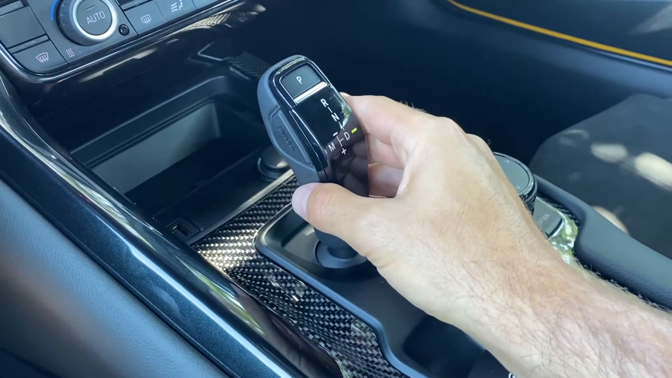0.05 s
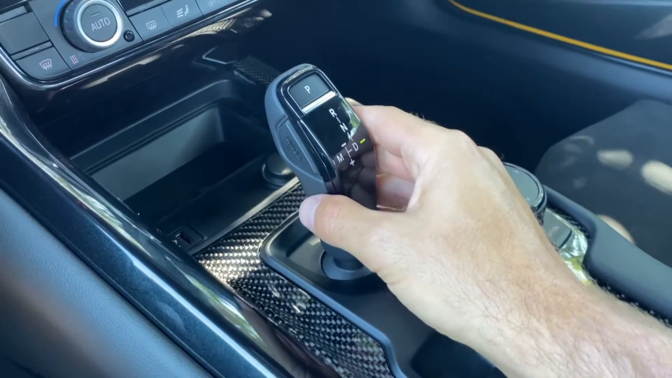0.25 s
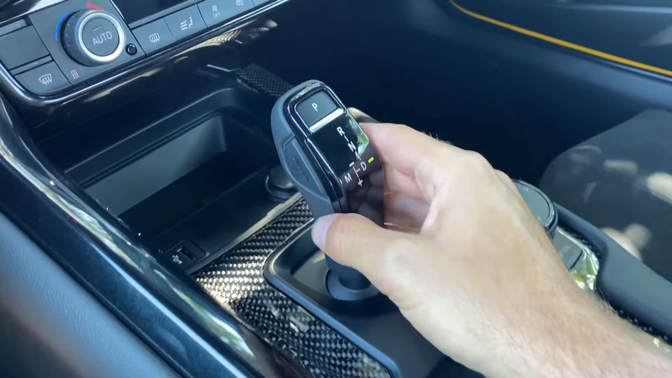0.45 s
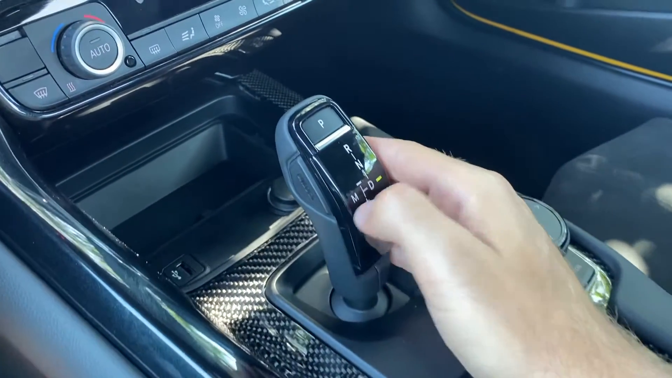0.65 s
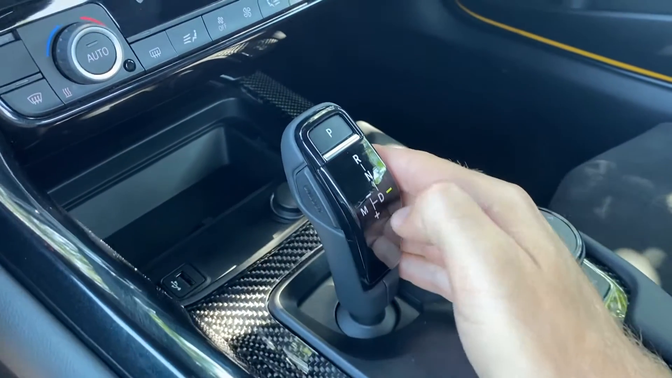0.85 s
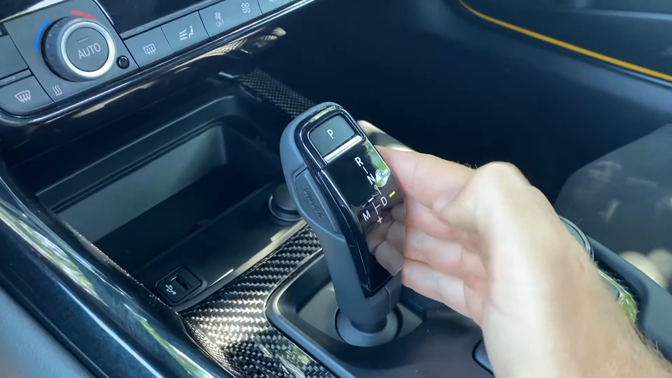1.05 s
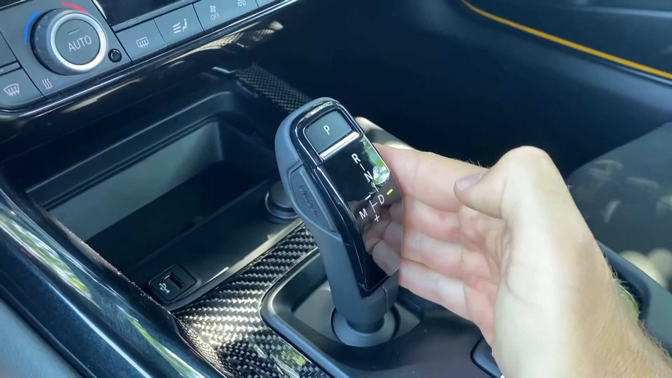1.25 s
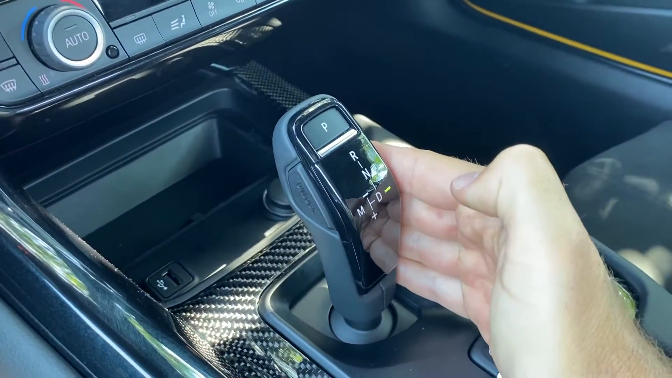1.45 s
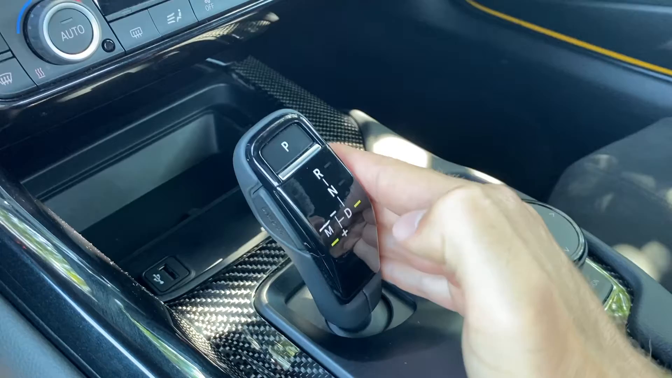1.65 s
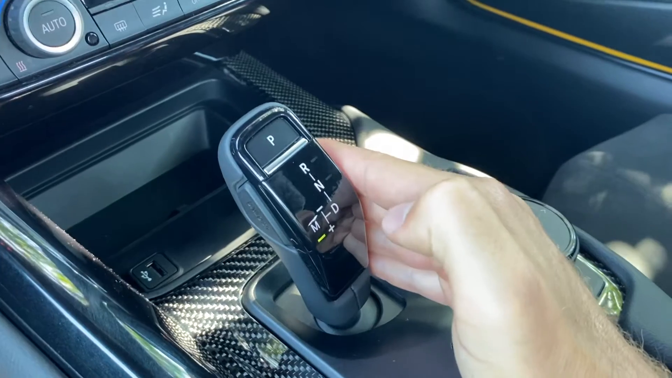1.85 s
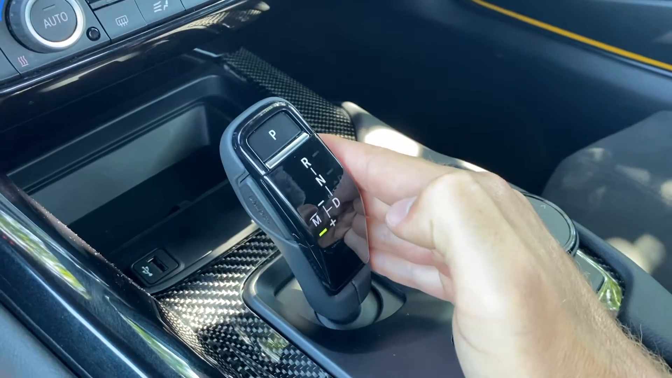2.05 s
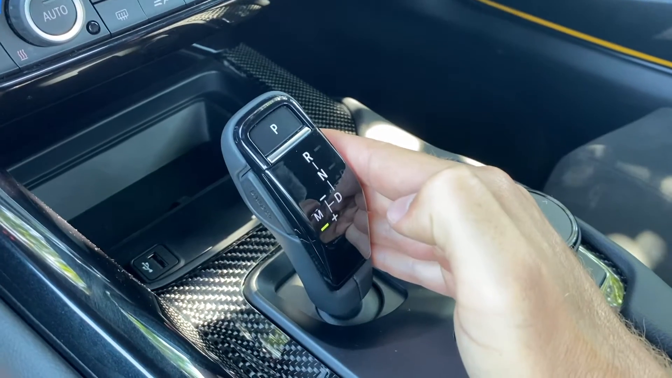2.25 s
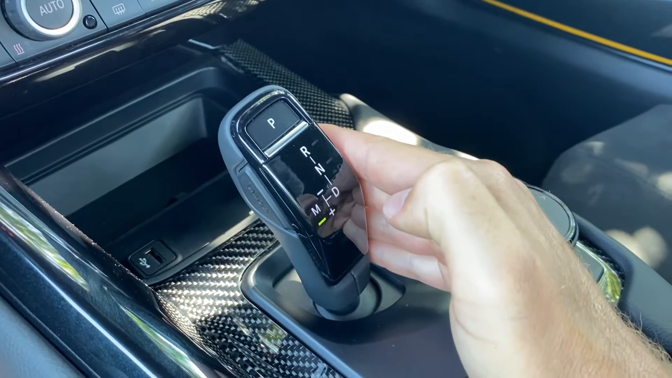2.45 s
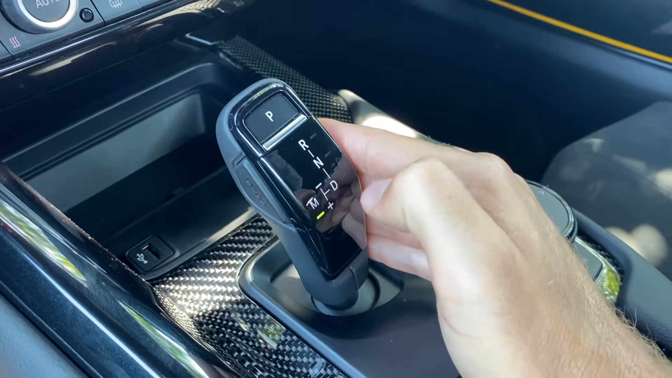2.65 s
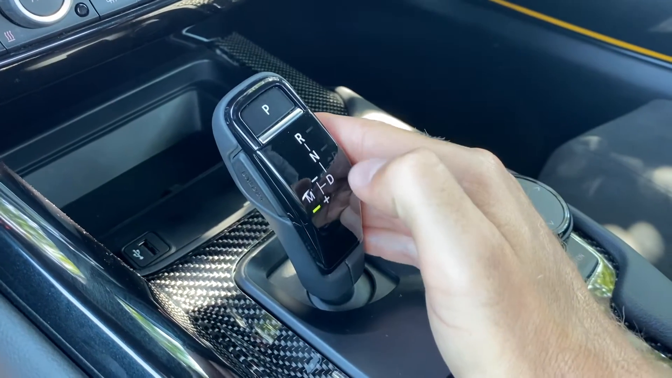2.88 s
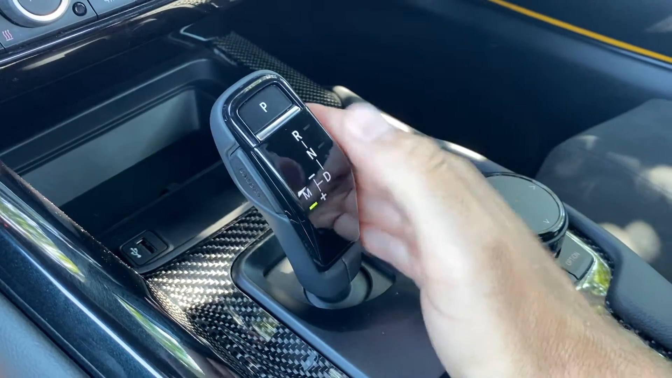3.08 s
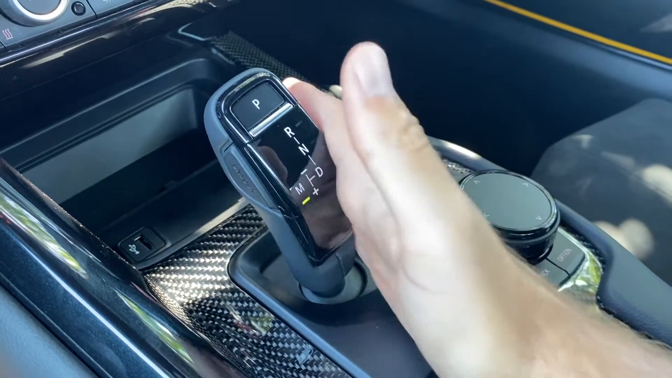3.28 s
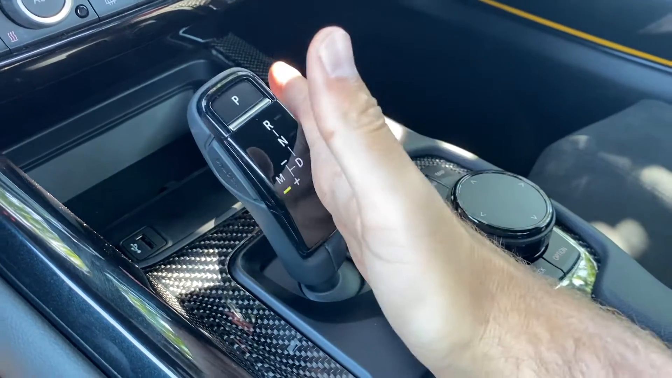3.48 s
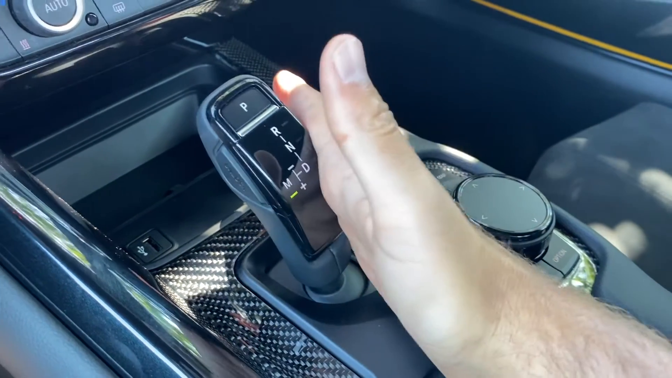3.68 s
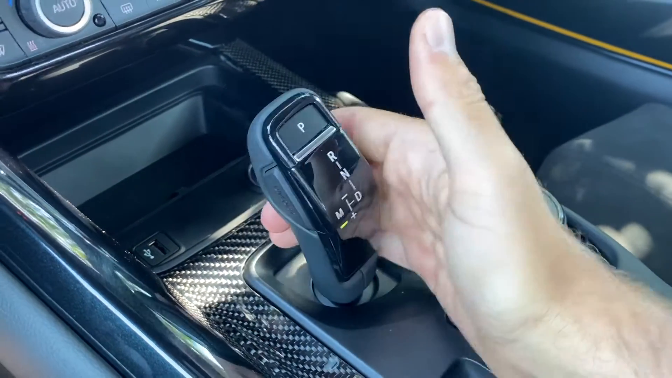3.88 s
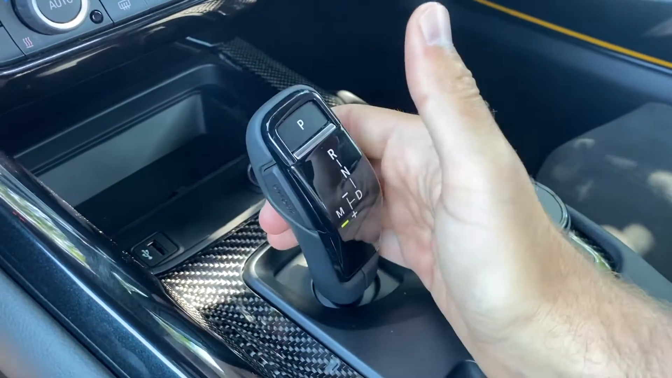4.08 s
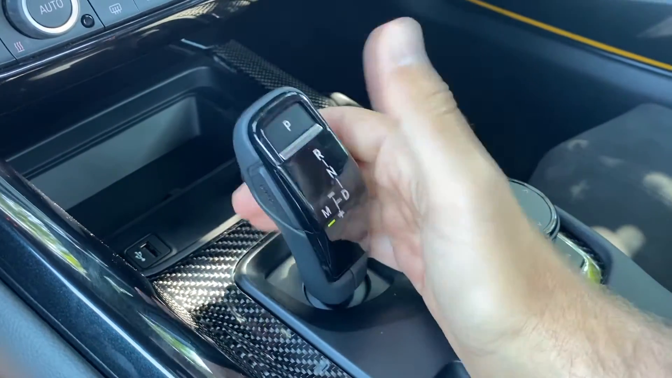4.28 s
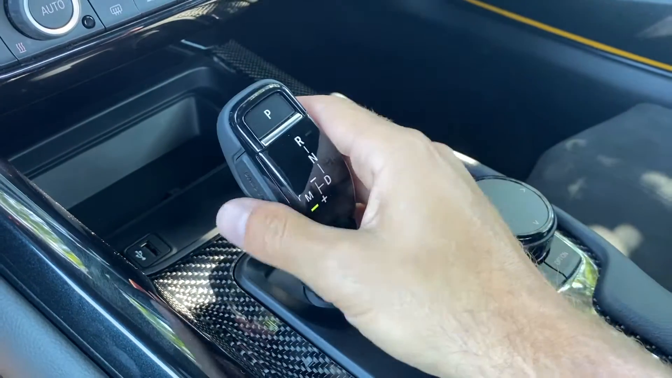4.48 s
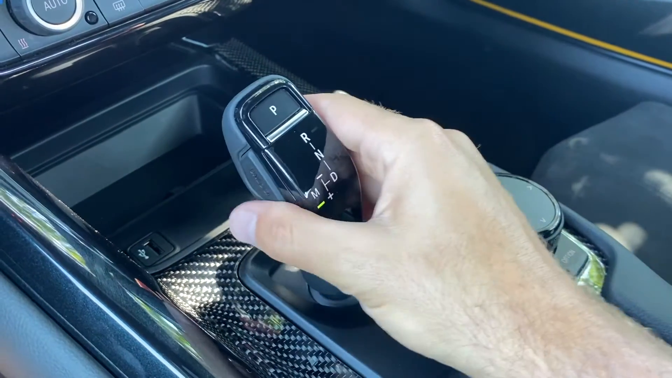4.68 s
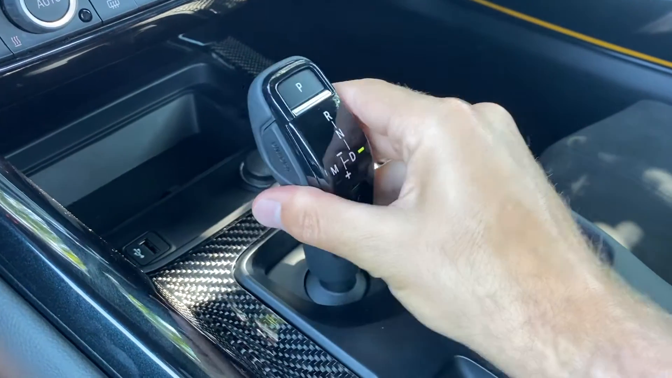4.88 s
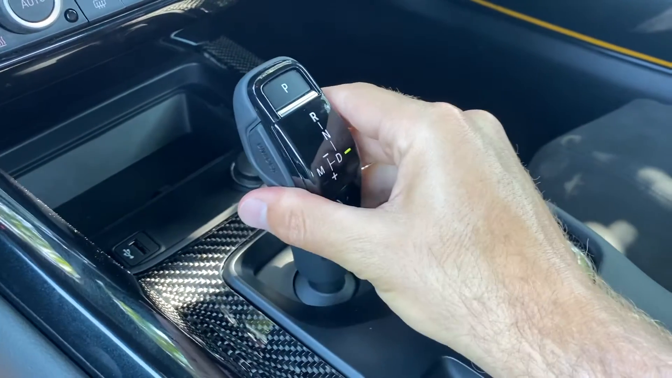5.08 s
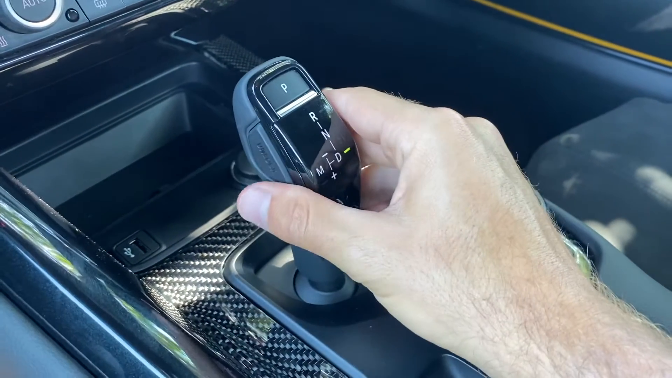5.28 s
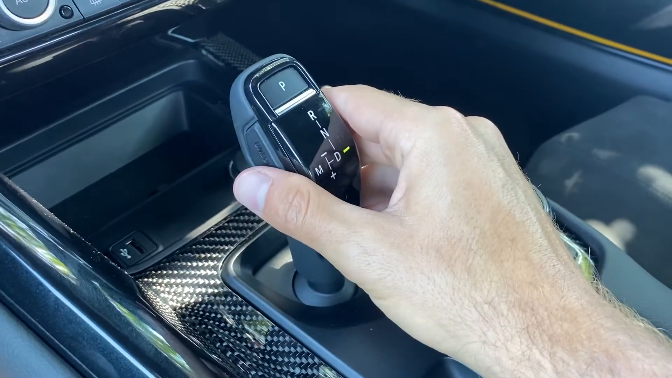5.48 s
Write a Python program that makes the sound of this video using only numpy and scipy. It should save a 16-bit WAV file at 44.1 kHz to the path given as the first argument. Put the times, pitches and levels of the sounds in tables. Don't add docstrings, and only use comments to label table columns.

```python
import sys
import numpy as np
from scipy import signal
from scipy.fft import rfft, irfft
from scipy.io import wavfile
from scipy.ndimage import uniform_filter1d

SR = 44100
rng = np.random.default_rng(int(sys.argv[2]) if len(sys.argv) > 2 else 0)


def magnitude_from_level(level_db):
    exponent = np.asarray(level_db, float) / 20
    return 10 ** exponent


def dump_mix(stems):
    frames = np.atleast_2d(stems).T
    limited = np.clip(frames, -1, 1)
    pcm = np.round(limited * 32767).astype(np.int16)
    wavfile.write(sys.argv[1], SR, pcm)


N = 243873

# start in seconds, clack level in dB,
# thud in dB relative to the clack, crack in dB relative to the clack.
CONTACTS = [(1.59, -59, 6, 3), (1.602, -48, -3, -4), (1.614, -40, -12, 3), (1.6188, -17, 0, -4),
            (1.624, -25, 1.5, -1), (1.64, -33.5, -14, -14), (3.065, -49.5, -5, -14.5), (3.356, -52, 8, -8),
            (3.36, -28.5, -1, -3), (3.373, -42, 6, 0), (3.8075, -46.5, 2, 3), (3.813, -40, 7.5, 1),
            (3.847, -23.5, 1, 0), (3.852, -28.5, -4, 0), (3.858, -34.5, 8.5, -21), (4.342, -44, 1, -3),
            (4.349, -34.5, 6, -2), (4.36, -35, 0, -7), (4.385, -51, 14, -10), (4.802, -41.5, -7, -5.5),
            (4.81, -44, 8, -3), (4.818, -37.5, 7.5, -1), (4.822, -17, -8, -5), (4.828, -47, 18, 5),
            (4.839, -56.5, 29, 8), (4.908, -56, 6, -8)]
POSITION_FROM_S = [0, 3, 3.6, 3.84, 4.1, 4.6]
# frequency in Hz, level in dB per Hz.
LEVER_MODES = [
    [(80, -4.5), (150, -20), (240, -1), (497, -8), (576, -1.5), (644, -10), (746, -1.5), (1200, -21)],
    [(130, -10), (238, -1), (377, -4), (467, -8), (812, -11), (890, -4), (1090, -17.5)],
    [(130, 0), (280, 2), (573, -13), (668, -3.5), (837, 1), (1150, -16)],
    [(100, -8), (123, -23), (178, -7), (573, -4), (641, -20), (751, -5.5), (891, -9.5), (1080, -12.5)],
    [(120, -9), (189, -4), (345, 0.5), (440, -12), (644, -13), (796, -2.5), (973, -15), (1070, -21.5)],
    [(80, -9), (157, -10), (253, -0.5), (390, -6), (529, -4), (746, -4.5), (853, -14), (965, -7)],
]
# frequency in Hz, level in dB per Hz.
MODES_BELOW = [(55, -38)]
MODES_ABOVE = [(1300, -24), (1500, -23), (1950, -47), (3300, -120)]
# frequency in Hz, time to fall 60 dB in seconds.
RING_T60 = [(80, 0.11), (250, 0.135), (700, 0.085), (1500, 0.035)]
# frequency in Hz, level in dB per Hz.
CRACK_COLOURS = [
    [(710, -21), (1200, 2.5), (1320, -5.5), (2480, -8.5), (4770, -22.5), (7980, -24.5), (15500, -37)],
    [(710, -19), (1200, -3), (1570, 3), (1860, -11), (2330, 0.5), (3010, -9.5), (10200, -31), (15500, -33)],
    [(710, -29), (1200, -3), (1880, -5), (2210, 3), (2540, -7), (9270, -24), (15500, -38)],
    [(710, -30), (1200, 0), (2010, -3.5), (2950, -2.5), (3810, -16), (5980, -14.5), (15500, -27)],
    [(710, -21), (1200, -1.5), (2800, -3.5), (3250, -9.5), (7020, -27), (7900, -21), (15500, -39)],
    [(710, -40), (1200, -7), (1490, -1), (3250, -13), (4880, -21), (8700, -23), (15500, -45)],
]
# start in seconds, pitch in Hz, level in dB,
# time to fall 60 dB in seconds.
AFTER_RINGS = [
    (1.628, 106, -53, 0.22),
    (3.066, 990, -53.5, 0.032),
    (4.365, 303, -49.5, 0.28),
    (4.38, 785, -55, .08),
    (4.825, 260, -26.5, 0.073),
    (4.831, 110, -47, .2),
    (4.911, 553, -47.5, 0.048),
]
THUD_TOP_HZ = 600
CRACK_FROM_HZ = 1300
HARD_CONTACT_S, HARD_CRACK_DB, DRAG_S_PER_DB = .0029, -25, .00008

# start in seconds, peak in dB, pitch in Hz,
# bright snap in dB relative to the peak.
TICKS = [(.514, -60, 2620, -8), (2.917, -67, 2400, -22), (2.967, -71, 11000, 0), (2.986, -72, 10000, -2),
         (3.057, -57, 2500, -8), (3.0562, -62, 7200, -18), (3.0615, -63, 12500, -6),
         (3.0655, -45.5, 2750, -12), (3.066, -54, 5500, -8), (3.0717, -51.5, 8450, -9),
         (3.074, -50, 4040, -8), (3.282, -61, 3200, -12), (3.3155, -47, 2240, -13), (3.3735, -58, 5000, -4),
         (3.377, -42.5, 1700, -5), (3.708, -71, 2600, -8), (3.752, -70, 7000, -4), (3.907, -64, 3200, -12),
         (3.918, -64, 2800, -12), (4.227, -68, 5000, -6), (4.257, -62, 3000, 6), (4.257, -63, 13400, -1),
         (4.342, -49.5, 5300, -6), (4.706, -64, 3200, -12), (4.737, -60, 3500, -3), (4.855, -62, 5500, -12),
         (4.966, -60, 2470, -6), (4.973, -63.5, 2950, -8), (5.207, -57, 2700, -3)]
TICK_T60_S = .0078
# start in seconds, swell in seconds, hold in seconds,
# rub level in dB, bright part in dB relative to the rub.
RUBS = [(.38, .116, .002, -86, -5), (2.94, .022, .024, -93, 7), (3.0, .05, .002, -93, 4),
        (3.075, .03, .07, -84, -14), (3.22, .074, .06, -74.5, -5), (3.35, .02, .025, -72, -.8),
        (3.73, .024, .004, -90, -4), (3.76, .04, .002, -76, -10), (3.89, .018, .15, -91, -12),
        (4.255, .003, .002, -82, 4), (4.29, .05, .002, -86, -8), (4.68, .03, .09, -86, -8)]
RUB_SWELL_DB, RUB_RELEASE_DB_PER_S = 18, 900
CABIN_T60_S, CABIN_DB = 0.061, -9.5

# time in seconds, hum pitch in Hz, hum level in dB,
# uneven shake at half the hum pitch in dB relative to the hum.
IDLE = [(0, 57.1, -45.5, -19), (.28, 56.7, -45.3, -22), (.6, 57.4, -47, -26), (1.0, 57.8, -46, -27),
        (1.3, 57.5, -45.8, -27), (2.3, 57.7, -45.3, -25.5), (2.6, 56.9, -45.2, -25),
        (3.5, 57.25, -45.8, -20.5), (3.87, 56.7, -43.3, -20), (4.17, 57, -45, -21), (4.8, 56.4, -43.5, -18),
        (5.1, 56.5, -43, -17), (5.53, 56.6, -43.5, -17)]
# multiple of the hum pitch, level in dB relative to the hum.
ORDERS_DB = [(.25, -17), (.75, -23), (1.25, -27), (1.75, -31), (2, -26.5), (2.25, -43), (2.5, -29.5),
             (3, -36.5), (4, -38)]
THREE_HALF_DB, UNEVEN_FROM_DB, THREE_HALF_LOSS = -17, -23, 1.1

# pitch in Hz, width in Hz, level in dB (rms).
WHINES = [(146.7, 2, -74.5), (326.3, 9, -78), (43.15, 2, -73), (668, 5, -90.5), (1048, 0.89, -82),
          (1169, 25, -88.5), (2580, 3.4, -106), (5235, 11, -103.5)]
# frequency in Hz, level in dB per Hz.
CABIN_AIR = [(100, -40), (170, -11.5), (230, -0.5), (294, -8), (329, 2.5), (362, -12.5), (437, -4),
             (480, -13.5), (896, -18), (1060, -23), (1380, -25), (3550, -38.5), (15500, -44)]
CABIN_AIR_DB, BODY_RUMBLE_DB, PRESSURE_DB = -68.5, -68, -57.5


def lever():
    out, size = np.zeros(N), 8192
    bodies = [console(MODES_BELOW + colour + MODES_ABOVE, size) for colour in LEVER_MODES]
    low = signal.butter(1, THUD_TOP_HZ, fs=SR)
    for s, clack_db, thud_db, crack_db in CONTACTS:
        softness_db = max(HARD_CRACK_DB - clack_db - crack_db, 0)
        length_s = HARD_CONTACT_S + DRAG_S_PER_DB * softness_db
        position = np.searchsorted(POSITION_FROM_S, s) - 1
        rattle = rng.standard_normal(size) * dying(size, 3 * length_s, rise_s=0.0015)
        force = .4 * rattle / np.sqrt(np.sum(rattle ** 2))
        force[20] += 1
        force = signal.lfilter([.25], [1, -.75], force)
        knock = signal.fftconvolve(force, bodies[position])[:size]
        thud = signal.lfilter(*low, knock)
        clack = knock - thud
        crack = coloured(CRACK_COLOURS[position], size) * dying(size, 7 * length_s, rise_s=.002)
        sound = magnitude_from_level(thud_db) * thud + clack + magnitude_from_level(crack_db - 4.5) * crack
        add(out, s, magnitude_from_level(clack_db - 1.5) * sound)
    return out


def console(colour, size):
    mode_hz = np.geomspace(85, CRACK_FROM_HZ, 28) * (1 + .02 * rng.standard_normal(28))
    signs = rng.choice([-1, 1], 28)
    click = signal.unit_impulse(size)
    ringing = np.zeros(size)
    for hz, sign in zip(mode_hz, signs):
        t60 = at_hz(RING_T60, hz)
        ringing += sign * np.sqrt(hz / t60) * ring(click, hz, t60)
    modes = rfft(ringing)
    bins = np.arange(len(modes)) * SR / size + 1
    found = uniform_filter1d(np.abs(modes), size=5)
    wanted = np.maximum(magnitude_from_level(at_hz(colour, bins)), 1e-3)
    return irfft(55 * modes * causal(wanted / found), size)


def loose_trim():
    out, size = np.zeros(N), 8192
    t = np.arange(size) / SR
    for s, hz, level_db, t60 in AFTER_RINGS:
        swell = dying(size, t60, rise_s=0.0031)
        add(out, s, magnitude_from_level(level_db) * swell * np.sin(2 * np.pi * hz * t))
    return out


def ticks():
    out, size = np.zeros(N), round(.06 * SR)
    for s, peak_db, hz, snap_db in TICKS:
        burst = rng.standard_normal((2, size)) * dying(size, TICK_T60_S, rise_s=0.0001)
        tiny_ring = 3 * band(burst[0], hz / 1.23, hz * 1.18)
        snap = magnitude_from_level(snap_db) * band(burst[1], 4500, 11000)
        add(out, s, magnitude_from_level(peak_db - 2) * (tiny_ring + snap))
    return out


def rubs():
    roughness = np.minimum(rng.exponential(1, (2, N)), 4)
    grains = rng.standard_normal((2, N)) * magnitude_from_level(1.5 * roughness)
    dull = rms_one(band(grains[0], 1100, 6700))
    bright = rms_one(band(grains[1], 4600, 15500))
    out, t = np.zeros(N), np.arange(N) / SR
    for s, swell_s, hold_s, level_db, bright_db in RUBS:
        rising = RUB_SWELL_DB * np.minimum((t - s) / swell_s - 1, 0)
        falling = RUB_RELEASE_DB_PER_S * np.maximum(t - s - swell_s - hold_s, 0)
        out += (t > s) * magnitude_from_level(level_db + rising - falling) * (dull + magnitude_from_level(bright_db) * bright)
    return out


def cabin(x):
    size = round(.15 * SR)
    tail = band(rng.standard_normal(size), 970, 11000) * dying(size, CABIN_T60_S, rise_s=0.00067)
    tail /= np.sqrt(np.sum(tail ** 2))
    return x + magnitude_from_level(CABIN_DB) * signal.fftconvolve(x, tail)[:N]


def engine():
    hum_hz, hum_db, half_db = in_time(IDLE)
    three_half_db = THREE_HALF_DB - THREE_HALF_LOSS * np.maximum(half_db - UNEVEN_FROM_DB, 0)
    turn = 2 * np.pi * np.cumsum(hum_hz) / SR
    turn -= turn[-1]
    out = magnitude_from_level(.5 * drift(13)) * np.sin(turn)
    out += magnitude_from_level(half_db) * np.sin(turn / 2 + 1)
    out += magnitude_from_level(three_half_db) * np.sin(turn * 3 / 2 + 2)
    for multiple, level_db in ORDERS_DB:
        phase = rng.uniform(0, 2 * np.pi)
        out += magnitude_from_level(level_db + 1.5 * drift(5.4)) * np.sin(multiple * turn + phase)
    return np.sqrt(2) * magnitude_from_level(hum_db) * out


def whines():
    out, t = np.zeros(N), np.arange(N) / SR
    for hz, width_hz, level_db in WHINES:
        wander = np.cumsum(rng.standard_normal(N)) * np.sqrt(2 * np.pi * width_hz / SR)
        out += np.sqrt(2) * magnitude_from_level(level_db) * np.sin(2 * np.pi * hz * t + wander)
    return out


def cabin_air():
    hiss = magnitude_from_level(CABIN_AIR_DB + .5 * drift(2.2)) * coloured(CABIN_AIR, N)
    rumble = magnitude_from_level(BODY_RUMBLE_DB) * rms_one(band(rng.standard_normal(N), 6, 210))
    swings = rms_one(band(rng.standard_normal(N), 2.5, 15, order=3))
    return hiss + rumble + magnitude_from_level(PRESSURE_DB + 3 * drift(3)) * swings


def ring(force, hz, t60):
    r, w = magnitude_from_level(-60 / (t60 * SR)), 2 * np.pi * hz / SR
    return signal.lfilter([0, np.sin(w)], [1, -2 * r * np.cos(w), r * r], force)


def dying(size, t60, rise_s):
    t = np.arange(size) / SR
    return (1 - np.exp(-t / rise_s)) * magnitude_from_level(-60 * t / t60)


def coloured(spectrum, size):
    bins = np.arange(size // 2 + 1) * SR / size + 1
    noise = rfft(rng.standard_normal(size))
    return rms_one(irfft(noise * magnitude_from_level(at_hz(spectrum, bins)), size))


def causal(gain):
    fold = irfft(np.log(gain + 1e-9))
    half = len(fold) // 2
    fold[1:half] *= 2
    fold[half + 1:] = 0
    return np.exp(rfft(fold))


def at_hz(points, hz):
    table_hz, value = np.transpose(points)
    return np.interp(np.log(hz), np.log(table_hz), value)


def in_time(rows):
    s, *columns = np.transpose(rows)
    return [np.interp(np.arange(N) / SR, s, c) for c in columns]


def drift(rate_hz):
    steps = rng.standard_normal(400)
    return np.interp(np.arange(N) / SR * rate_hz, np.arange(400), steps)


def band(x, low_hz, high_hz, order=2):
    limits = [low_hz, min(high_hz, .45 * SR)]
    return signal.sosfilt(signal.butter(order, limits, "band", fs=SR, output="sos"), x)


def rms_one(x):
    return x / np.sqrt(np.mean(x ** 2) + 1e-30)


def add(out, s, sound):
    at = round(s * SR)
    out[at:at + len(sound)] += sound[:N - at]


def scene():
    hand = cabin(lever() + loose_trim() + ticks()) + rubs()
    return (hand + engine() + whines() + cabin_air())[None]


def top_cut(x):
    return signal.sosfilt(signal.butter(12, 15760, fs=SR, output="sos"), x)


def record(dry):
    return top_cut(dry)


dry = scene()
out = record(dry)
dump_mix(out)
```